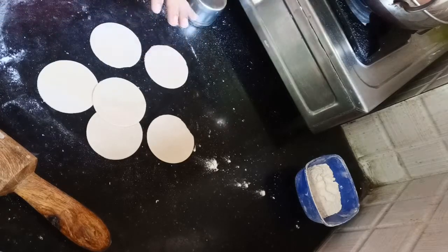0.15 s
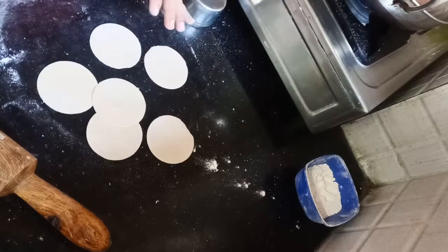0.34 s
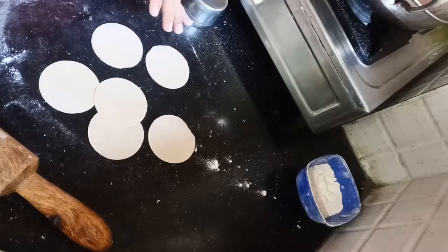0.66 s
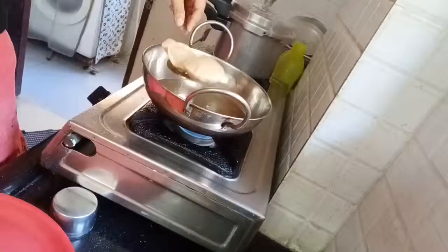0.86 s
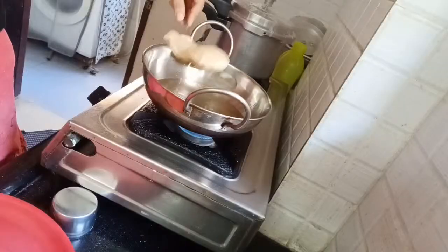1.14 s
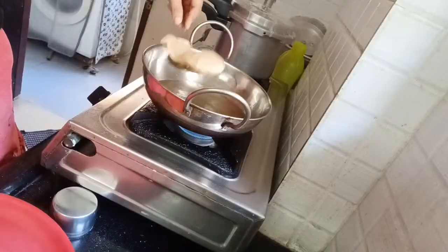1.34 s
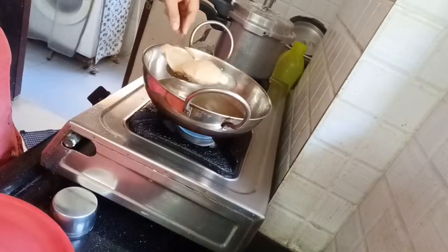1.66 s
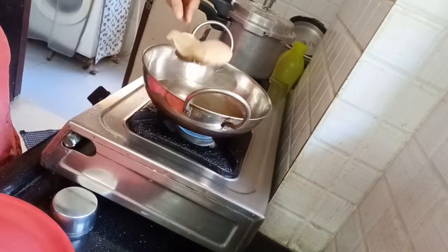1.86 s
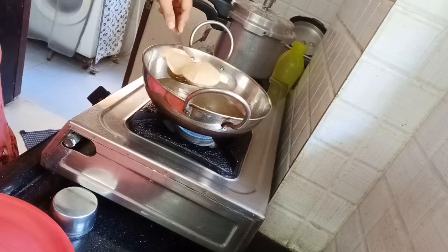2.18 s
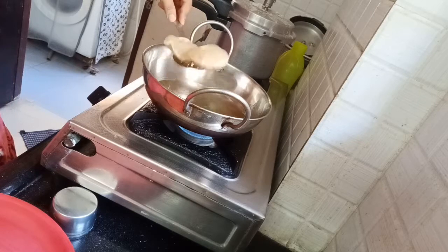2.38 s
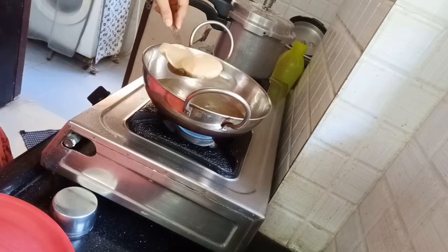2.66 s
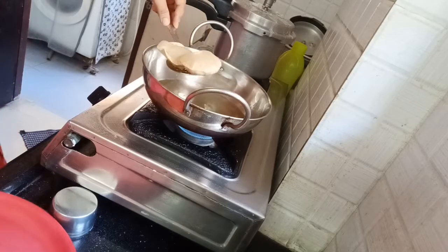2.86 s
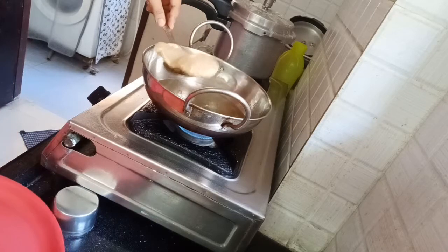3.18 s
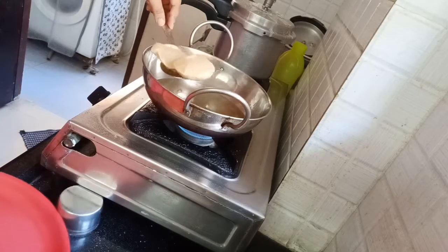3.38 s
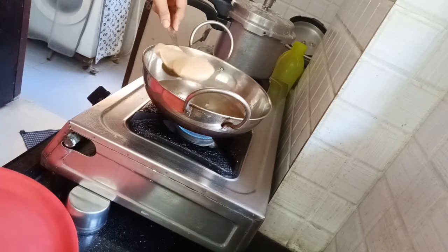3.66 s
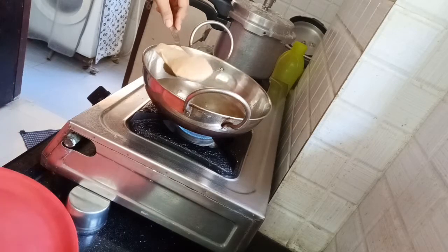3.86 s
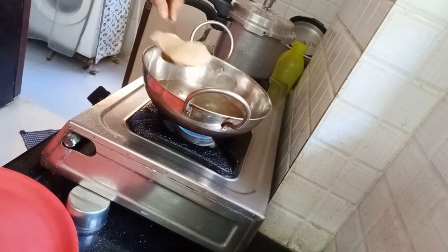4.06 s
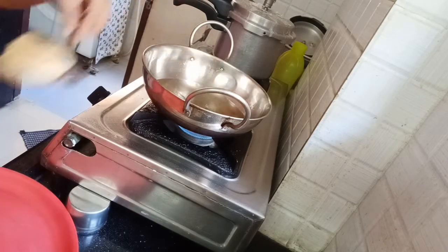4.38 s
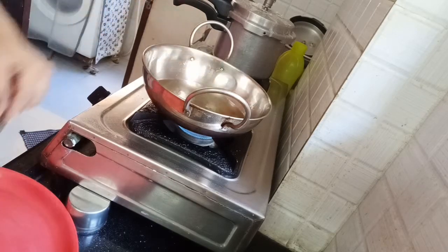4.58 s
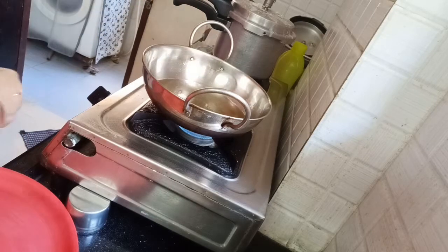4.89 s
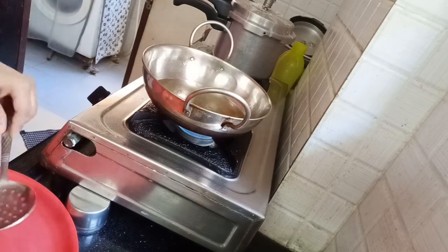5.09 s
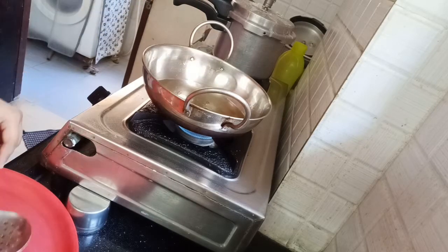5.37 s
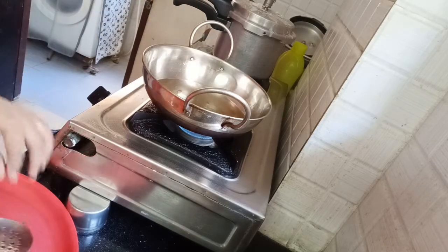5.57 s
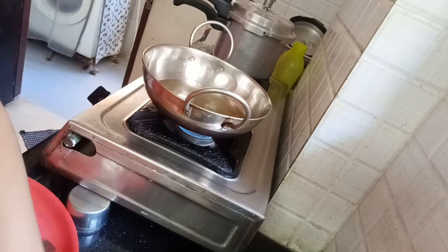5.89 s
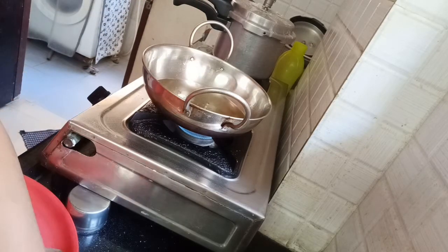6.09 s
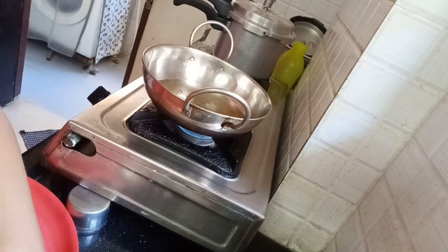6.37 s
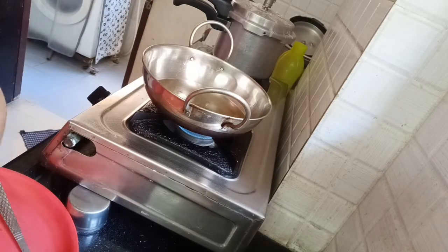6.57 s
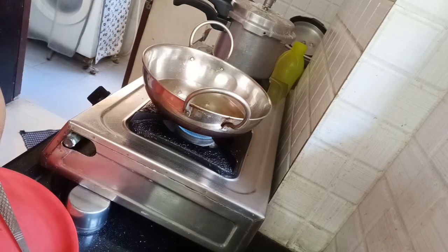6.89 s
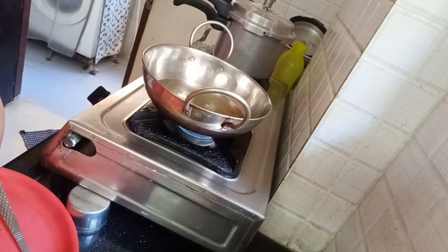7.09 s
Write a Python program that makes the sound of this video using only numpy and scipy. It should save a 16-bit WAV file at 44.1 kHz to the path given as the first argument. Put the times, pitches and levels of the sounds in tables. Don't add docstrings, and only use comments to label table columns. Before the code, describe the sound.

A close phone microphone in a small tiled kitchen. From 0 s, a faint high gas-burner hiss with slight room rumble fades to near silence by 0.87. At 0.88 a steam jet bursts in abruptly, loud, broad and bright with a thin singing edge around 7 kHz; it holds until about 1.35, then falls and is gone by 1.8. A metallic clank sits under its tail at 1.4. Quiet burner hiss remains, with distant pan hums, dull thumps and soft rustles. A short rough pot scrape runs 2.6-3.1, with a light hollow knock at 2.94. Faint far clatter continues; another light knock and rustle come at 4.72. At 5.41 a steel skimmer lands hard on a hollow plastic plate: a sharp crack, then dense ticks and rocking knocks until 5.8, sparser taps to 6.2. Faint hiss and tiny distant hums close by 7.2.

```python
import sys
import numpy as np
from scipy import signal
from scipy.fft import rfft, irfft, next_fast_len
from scipy.io import wavfile
from scipy.ndimage import uniform_filter1d, map_coordinates

SR = 44100
rng = np.random.default_rng(int(sys.argv[2]) if len(sys.argv) > 2 else 0)


def master(y):
    cut = np.clip(np.atleast_2d(y).T, -1, 1)
    pcm = np.round(cut * 32767)
    wavfile.write(sys.argv[1], SR, pcm.astype(np.int16))


def voltage_ratio(decibels):
    exponent = np.asarray(decibels, float) / 20
    return 10 ** exponent


N = 319284
CUT_S = 0.881


def unit(x):
    return x / np.sqrt(np.mean(x ** 2) + 1e-20)


def along(points, hz):
    f, v = np.transpose(points)
    return np.interp(np.log(hz + 1), np.log(f + 1), v)


def curves(rows):
    s, *cols = np.vstack(rows).T
    return [np.interp(np.arange(N) / SR, s, c) for c in cols]


def wobble(rate_hz, size=N):
    knots = rng.standard_normal(int(size * rate_hz / SR) + 4)
    return map_coordinates(knots, [np.arange(size) * rate_hz / SR])


def filtered(x, response):
    m = next_fast_len(N + SR // 2)
    return irfft(rfft(x, m) * response(np.fft.rfftfreq(m, 1 / SR)), m)[..., :N]


def patchy(depth_db):
    z = signal.stft(rng.standard_normal(N + 512), nperseg=512)[2]
    field = uniform_filter1d(rng.standard_normal(z.shape), size=5, axis=0)
    field = uniform_filter1d(field, size=12, axis=1)
    return signal.istft(z * voltage_ratio(depth_db * unit(field)), nperseg=512)[1][:N]


def coloured(x, spectrum):
    return unit(filtered(x, lambda hz: voltage_ratio(along(spectrum, hz))))


def resonant(x, peaks):
    def once(f):
        total = 0
        for k, (centre, width, db) in enumerate(peaks):
            damping = 1j * f * width
            total = total + (-1) ** k * voltage_ratio(db / 2) * damping / (centre * centre - f * f + damping)
        return total
    return unit(filtered(x, lambda f: once(f) ** 2))


def ring(modes, t, spread_db):
    out = 0
    for hz, db, t60 in modes:
        level_db = db + spread_db * rng.standard_normal() - 60 * t / t60
        out = out + voltage_ratio(level_db) * np.sin(2 * np.pi * hz * t)
    return out


def bursts(rows, rise_db_s, fall_db_s):
    t = np.arange(0, N, 32)[:, None] / SR
    s, held, *cols = np.transpose(rows)
    loss_db = rise_db_s * np.maximum(s - t, 0) + fall_db_s * np.maximum(t - s - held, 0)
    gains = [np.linalg.norm(voltage_ratio(c - loss_db), axis=1) for c in cols]
    return [np.interp(np.arange(N) / SR, t[:, 0], g) for g in gains]


def swell(t, rise_s, t60):
    return np.minimum(t / rise_s, 1) * voltage_ratio(-60 * np.maximum(t - rise_s, 0) / t60)


def steady(x):
    return x / np.sqrt(np.abs(uniform_filter1d(x ** 2, size=1300)) + 0.014)


def room(x, decay):
    hz, t, z = signal.stft(rng.standard_normal(SR // 2), SR, nperseg=256)
    tail = signal.istft(z * voltage_ratio(-60 * t / along(decay, hz)[:, None]), SR, nperseg=256)[1]
    return signal.fftconvolve(np.pad(x, (200, 0)), tail / np.linalg.norm(tail))[:N]


def thumps():
    # start_s, held_s, lower_mode_db, upper_mode_db
    floor_bumps = [(.1, 0.16, -67, -57.5), (.386, 0.009, -65, -60), (.448, 0.011, -70, -84),
                   (1.66, 0.091, -69, -65.5), (2.0, 0.013, -57, -58), (2.08, .01, -62, -72),
                   (2.15, 0.0088, -63, -58.5), (2.98, 0.016, -44.5, -70), (3.3, 0.02, -63, -80),
                   (3.48, .01, -66, -82), (3.64, 0.0088, -67, -53.5), (3.77, 0.0077, -57, -57.5),
                   (3.87, 0.047, -58, -58), (4.01, 0.0049, -62, -47.5), (4.12, 0.035, -69, -60.5),
                   (4.73, 0.083, -55, -54), (4.83, 0.014, -51.5, -58), (5.445, 0.041, -44.5, -40),
                   (5.65, 0.066, -45.5, -49), (5.868, 0.0077, -57.5, -57.5), (6.05, 0.056, -46.5, -48),
                   (6.17, 0.05, -49.5, -48.5), (6.39, 0.1, -60, -54), (7.0, 0.088, -68, -63.5)]
    gains = bursts(floor_bumps, rise_db_s=320, fall_db_s=274)
    rests = [voltage_ratio(rest_db + 3.6 * wobble(8.9)) for rest_db in (-71.5, -75)]
    peaks = [(105.3, 21.3, 0)], [(150.8, 23.7, 0)]  # centre_hz, width_hz, level_db
    modes = [steady(resonant(rng.standard_normal(N), peak)) for peak in peaks]
    return sum(np.hypot(gain, rest) * mode for gain, rest, mode in zip(gains, rests, modes))


def hums():
    # start_s, t60_s (60 dB down at 0.7 of it), pitch_hz, level_db
    pans = [(2.1, 0.91, 2180, -64), (2.5, 1.2, 1300, -71), (2.5, 1.3, 2170, -54), (2.5, 0.6, 5800, -59),
            (2.5, 0.59, 452, -50.5), (3, 0.39, 450, -49), (2.5, 0.44, 2500, -55), (3, 0.2, 2490, -55),
            (3, 0.4, 1450, -58), (3.5, 0.3, 1440, -54.5), (3, 0.68, 356.3, -46.5), (3, 0.7, 890, -47.5),
            (3.36, 0.87, 960, -55.5), (3, 0.31, 450, -47), (3.5, 0.18, 980, -48.5), (3.5, 0.5, 910, -58.5),
            (3.5, 0.5, 7560, -56), (4, 0.33, 690, -69), (3.5, 0.42, 380, -53.5), (4.03, 0.77, 840, -59.5),
            (5, 0.47, 2400, -59), (5.5, 0.23, 350, -37), (5.5, 0.45, 1340, -41), (6.08, .4, 9900, -68),
            (6.09, 0.3, 7300, -52), (6.101, 0.33, 390, -56), (6.22, 0.7, 2890, -61), (0.0, .6, 4100, -63),
            (0.2, 1.3, 3325, -65), (.25, .8, 1465, -67), (2.17, .5, 4105, -59), (1.5, .4, 4505, -62),
            (1.98, .2, 1100, -61), (2.18, .4, 3350, -64), (6.28, .4, 1210, -63), (6.06, .3, 2400, -57),
            (6.48, 1, 699, -62), (0, 2.7, 798, -69), (4.98, 0.5, 1100, -63)]
    # start_s, t60_s (60 dB down at 0.7 of it), pitch_hz, level_db
    shelf = [(1.395, 0.61, 1015, -41.5), (1.42, .4, 1480, -45), (3.42, 0.58, 9740, -57),
             (4.375, 0.48, 1115, -58.5), (4.58, 0.32, 900, -62), (4.92, 1.2, 2810, -60.5),
             (5.9, .8, 2950, -60), (2.08, 0.44, 1120, -60), (2.95, 0.3, 409, -52), (2.96, .45, 770, -55),
             (3.3, .7, 633, -64), (3.58, 0.66, 3140, -65.5), (3.7, .5, 3600, -69),
             (3.739, 0.23, 1015, -54.5), (3.78, 1, 3180, -64), (3.76, 0.77, 1390, -63),
             (3.919, 0.77, 1015, -59), (3.95, .9, 3710, -67), (4.081, 0.31, 1140, -58),
             (4.12, 0.47, 4100, -60), (4.17, .3, 910, -65), (4.38, .6, 3700, -65), (4.55, .8, 3680, -60),
             (4.47, 0.32, 720, -60), (4.52, .5, 3420, -61), (4.74, 0.26, 430, -46.5),
             (4.76, 0.83, 948, -55), (4.73, .9, 1910, -59), (4.77, .3, 2725, -58), (4.8, 0.4, 4000, -63),
             (4.92, .5, 3340, -64), (5.0, .35, 920, -65), (5.09, 0.26, 680, -65), (5.041, 0.28, 2410, -64),
             (5.14, 0.63, 2840, -65), (5.249, 0.35, 1154, -70), (5.121, 0.22, 1480, -64),
             (5.425, .25, 1440, -38), (5.43, 0.3, 1910, -39), (5.56, .2, 1880, -46),
             (5.6, 0.43, 1460, -45.5), (5.93, 0.67, 3250, -60), (5.91, .4, 3640, -58),
             (6.17, 0.25, 1390, -55), (6.2, 1.1, 3640, -63), (6.31, .25, 4720, -63), (6.47, .35, 1520, -61),
             (6.481, 0.71, 1890, -66), (6.48, .5, 2208, -63), (6.62, 1.4, 3500, -76),
             (6.86, 0.18, 895, -65), (6.95, .4, 4770, -66), (7.07, 0.78, 3650, -67), (7.12, .4, 1320, -67),
             (7.15, .4, 1022, -64)]
    # start_s, t60_s (60 dB down at 0.7 of it), pitch_hz, level_db
    loose_lids = [(1.4, 0.57, 5040, -38), (6.6, 1.6, 2895, -83), (0.202, 1.4, 1583, -66),
                  (3.801, 1.5, 3350, -59), (4.5, 1.08, 3090, -67), (5.85, 2.0, 3450, -55.5),
                  (5.75, .5, 2700, -58), (6.44, 0.51, 1200, -56), (7.089, 0.67, 1183, -60)]
    rise_s = 0.023
    out, t = np.zeros(N + SR), np.arange(SR) / SR
    for rows, blur in ((pans, 1.08), (shelf, 0.75), (loose_lids, 7.55)):
        for s, t60, hz, db in rows:
            line_width_hz = blur * np.sqrt(hz)
            drift = np.cumsum(rng.standard_normal(SR)) * np.sqrt(2 * np.pi * line_width_hz / SR)
            level_db = db + 2.6 * wobble(40, size=SR) - 60 * (t / (.7 * t60)) ** 2
            phase = 2 * np.pi * hz * t + uniform_filter1d(drift, size=60)
            out[round(s * SR):][:SR] += voltage_ratio(level_db) * np.minimum(t / rise_s, 1) * np.sin(phase)
    return out[:N]


def stir():
    # start_s, held_s, drum_db, clatter_db
    pushes = [(1.46, 0.04, -73, -50), (1.82, 0.63, -78, -64.5), (2.7, 0.047, -77, -59),
              (2.84, 0.094, -79, -65), (2.96, 0.067, -53, -59), (3.41, .02, -70, -67),
              (3.82, 0.46, -69, -66.5), (4.45, .05, -75, -72), (4.75, 0.18, -69.5, -65),
              (5.62, 0.019, -51, -47), (5.86, 0.022, -59, -59.5), (6.05, 0.11, -67.5, -55.5),
              (6.58, 0.03, -81, -63), (7.15, 0.028, -70, -66)]
    # centre_hz, width_hz, level_db
    drum_peaks = [(349.6, 30, -3), (438, 58, -2), (678, 255, -7.5)]
    # centre_hz, width_hz, level_db
    clatter_peaks = [(780, 155, -6), (920, 60, 6.5), (1111, 200, 3), (1497, 247, 2), (1890, 345, -5.5)]
    # freq_hz, density_db_per_hz
    rumble_spectrum = [(13, -45), (22, -10), (43, -14), (103, -4.5), (166, -2.5), (226, -3.5), (300, -1),
                       (390, -53), (660, -120)]
    drum_gain, clatter_gain = bursts(pushes, rise_db_s=121, fall_db_s=96)
    drum_gain = np.hypot(drum_gain, voltage_ratio(-76.5))
    clatter_gain = np.hypot(clatter_gain, voltage_ratio(-68))
    drum = drum_gain * voltage_ratio(1.2 * wobble(6.3)) * resonant(patchy(depth_db=3), drum_peaks)
    clatter = clatter_gain * voltage_ratio(1.5 * wobble(20)) * resonant(patchy(depth_db=2.4), clatter_peaks)
    rumble_gain = np.minimum(clatter_gain, voltage_ratio(-66.5)) * voltage_ratio(-6.5)
    return drum + clatter + rumble_gain * coloured(patchy(depth_db=-2.5), rumble_spectrum)


def scrape():
    # start_s, level_db
    drag = [(2.58, -61.5), (2.64, -47.5), (2.7, -46), (2.8, -48), (2.87, -52), (2.92, -55), (3.0, -54),
            (3.1, -58)]
    # centre_hz, width_hz, level_db
    pot_peaks = [(452, 30, -9.5), (820, 37, -11.5), (1140, 140, -16), (1714, 60, -6), (2174, 85, 0),
                 (2490, 160, -9), (3040, 45, -5), (3470, 54, -9), (3930, 35, -9), (4680, 200, -9)]
    level_db, = curves(drag)
    t = np.arange(N) / SR
    slips = voltage_ratio(0.88 * wobble(45)) * rng.standard_normal(N)
    grit = .5 * resonant(slips, [(2080, 1800, 0)])
    moving = (t > drag[0][0]) * (t < drag[-1][0])
    return (resonant(slips, pot_peaks) + grit) * voltage_ratio(level_db) * moving


def brushes():
    # start_s, rise_s, t60_s, level_db
    strokes = [(2.1, 0.051, 0.75, -49.5), (2.58, 0.067, 1, -51.5), (3.03, 0.064, 0.75, -45.5),
               (3.12, 0.058, 0.43, -52.5), (3.39, 0.089, 0.68, -47.5), (4.05, 0.076, 0.35, -55),
               (4.42, 0.076, 0.41, -53.5), (4.713, 0.022, 1.46, -42.5), (5.412, 0.023, 0.6, -35),
               (5.535, 0.0092, 1.05, -40.5), (6.08, 0.048, 0.95, -47), (6.43, 0.069, 0.36, -55)]
    # freq_hz, density_db_per_hz
    rustle_spectrum = [(290, -27), (500, -8.5), (578, -7), (933, -7), (1230, -10.5), (1400, -6.5),
                       (1620, -9), (5020, -9), (6700, -8.5), (14900, -27.5), (16000, -9.5)]
    level, t = np.zeros(N + SR), np.arange(SR) / SR
    for s, rise_s, t60, db in strokes:
        level[round(s * SR):][:SR] += voltage_ratio(db) * swell(t, rise_s, t60)
    grains = voltage_ratio(1.8 * wobble(120)) * patchy(depth_db=-2.0)
    return level[:N] * coloured(grains, rustle_spectrum)


def burner():
    # start_s, strength_db
    flame = [(0.0, -52.5), (.1, -53), (1.68, -50.5), (1.87, -52), (2.59, -51), (2.66, -44.5), (2.8, -48),
             (3.03, -50.5), (3.48, -51.5), (3.62, -52.5), (4.49, -53), (4.7, -53.5), (5.4, -54),
             (5.58, -50.5), (5.79, -53.5), (6.36, -54), (7.24, -55.5)]
    # freq_hz, density_db_per_hz
    hiss_spectrum = [(2530, -24), (4300, -29), (5790, -11.5), (6820, -0.5), (7960, -9.5), (9340, -14.5),
                     (11100, -15), (12200, -18), (14900, -16.5), (16000, -14.5)]
    # freq_hz, density_db_per_hz
    roar_spectrum = [(1060, -35), (1800, -42), (1910, -32), (2310, -7.5), (2440, -9.5), (3180, -3),
                     (3750, -1.5), (4250, -6), (4800, -4.5), (6240, -4), (10600, -120)]
    flame_db, = curves(flame)
    spits = (rng.random(N) < 300 / SR) * rng.standard_normal(N)
    hiss = coloured(unit(patchy(depth_db=1.45)) + .3 * unit(spits), hiss_spectrum)
    roar = coloured(patchy(depth_db=1.6), roar_spectrum)
    usual_flame_db = -53
    roar_db = -61 + 1.4 * (flame_db - usual_flame_db)
    return voltage_ratio(flame_db + 0.088 * wobble(4.94)) * hiss + voltage_ratio(roar_db) * roar


def steam():
    # (2.44 dB of low boost per unit, with some loss of highs)
    pressure = [
        (0.89, -14, 0.5),
        (0.902, -17.5, 1),
        (1.33, -17, 0.5),
        (1.488, -25.5, 4.5),
        (1.632, -46.5, 3.5),
        (1.8, -62, 7.5),
    ]
    # freq_hz, density_db_per_hz
    jet_spectrum = [(16, -54), (28, -21), (111, -17.5), (383, -23.5), (800, -19), (966, -20), (1640, -23.5),
                    (3000, -12.5), (4720, -15), (5530, -11), (6830, .5), (7700, -3.5), (8200, -9),
                    (8800, -8.5), (9630, -13), (10700, -10), (11900, -16.5), (15500, -14.5)]
    # centre_hz, width_hz, level_db
    lid_peaks = [(5884, 20, -8), (6024, 25, -10), (6325, 20, -5), (6420, 45, -3), (6544, 22, -2),
                 (6611, 20, -2), (6702, 18, -2), (6817, 18, -4), (6894, 18, 0), (6972, 18, -2),
                 (7068, 35, -2), (7315, 20, -5), (7559, 16, -3), (7661, 18, -3)]
    # freq_hz, t60_s
    wall_decay = [(200, .06), (1500, .1), (7000, .35), (15000, .2)]
    level_db, tilt_db = curves(pressure)
    t = np.arange(N) / SR
    drops = voltage_ratio(1.3 * wobble(260)) * rng.standard_normal(N)
    jet = drops + 0.78 * patchy(depth_db=3.0)
    jet = coloured(jet + .5 * room(jet, wall_decay), jet_spectrum)
    jet = unit(jet + 0.38 * resonant(drops, lid_peaks))
    low = filtered(jet, lambda hz: 1 / (1 + (hz / 2200) ** 4) / (1 + (350 / (hz + 1)) ** 4))
    high = filtered(jet, lambda hz: 1 / (1 + (9500 / (hz + 1)) ** 6))
    dulled = jet - np.clip(0.073 * tilt_db, 0, .8) * high + (voltage_ratio(2.44 * tilt_db) - 1) * low
    valve = np.clip((t - CUT_S) / 0.019, 0, 1) * (t < pressure[-1][0])
    return valve * voltage_ratio(level_db + 0.14 * wobble(21.6)) * dulled


def skimmer():
    # start_s, peak_db, brightness_db, ring_db
    ticks = [(2.935, -26, -23, -32), (4.715, -29.5, -14, -19), (5.288, -49, -27, -22),
             (5.4113, -8, -16, -24), (5.4374, -15, -24, -29), (5.532, -14.5, -10, -16.5),
             (5.5449, -26, -2, -32), (5.575, -27, -20, -28), (5.807, -36, -25, -28), (5.561, -18, -20, -28),
             (5.625, -24, -18, -16), (5.6664, -27.5, -14, -14), (5.6775, -24, -34, -32),
             (5.7647, -27, -18, -19), (5.8922, -30.5, -25, -19), (5.911, -34, -22, -28),
             (6.1018, -32, -14, -20), (6.109, -32.5, -20, -22), (6.1368, -26.5, -15, -19),
             (6.168, -32, -18, -13), (5.5205, -29, -30, -32), (5.724, -32, -20, -25)]
    # freq_hz, level_db, t60_s
    steel_modes = [(2410, -1, 0.024), (2930, -9.5, 0.034), (3160, -10, 0.04), (5940, -25, 0.084),
                   (6560, -4, 0.035), (6850, 0, .045), (7120, -1, .04), (7400, -3, 0.056),
                   (7600, -4, 0.045), (9200, -19, 0.085), (9810, -11, 0.075), (10290, -20, 0.077),
                   (12000, -14, .05), (13740, -22, .05)]
    # freq_hz, density_db_per_hz
    crack_spectrum = [(100, -36), (880, -4), (1500, -4), (2300, -4), (2930, -1.5), (3840, -2.5),
                      (4800, -10.5), (6760, -8.5), (8770, -16), (10000, -29), (11500, -27), (12000, -25),
                      (15600, -47), (22000, -120)]
    cracks, edges, rings = np.zeros((3, N + SR))
    t = np.arange(SR // 4) / SR
    decay = voltage_ratio(-60 * t / 0.0077) + 0.089 * voltage_ratio(-60 * t / 0.07)
    for s, db, bright_db, ring_db in ticks:
        snap = voltage_ratio(db - 6.5) * decay * rng.standard_normal((2, len(t)))
        snap[:, 0] += voltage_ratio(db + 3)
        span = slice(round(s * SR), round(s * SR) + len(t))
        cracks[span] += snap[0]
        edges[span] += voltage_ratio(bright_db + 4) * snap[1]
        rings[span] += voltage_ratio(db + ring_db) * ring(steel_modes, t, spread_db=2.5)
    crack = filtered(cracks[:N], lambda hz: voltage_ratio(along(crack_spectrum, hz) + 6.0))
    edge = filtered(edges[:N], lambda hz: 1 / (1 + (8500 / (hz + 1)) ** 6))
    return crack + edge + rings[:N]


def plate():
    # start_s, peak_db, low_body_db, pitch_hz, contact_ms
    hard_knocks = [
        (2.9375, -25.5, -21.5, 789, 4.16),
        (4.7175, -28, -24, 820, 2.9),
        (5.4123, -13, -6.5, 877, 2.45),
    ]
    # start_s, peak_db, low_body_db, pitch_hz
    rocking = [(2.952, -36.5, 7, 787), (2.968, -43, 5, 765), (3.0, -45, 0, 765), (4.724, -33, -12, 844),
               (4.731, -27, -7, 875), (4.744, -33.5, 1, 850), (4.754, -41, 11, 796), (5.419, -20, -12, 898),
               (5.433, -19.5, -0.5, 880), (5.4375, -17, -2, 863), (5.448, -30, 10, 860),
               (5.454, -21.5, 3.5, 838), (5.464, -28, 2, 1000), (5.474, -24, 0.5, 880),
               (5.489, -31, -10, 944), (5.507, -22, -12, 880), (5.519, -34, -5, 930),
               (5.546, -20.5, -2, 889), (5.56, -21.5, -9.5, 920), (5.566, -22, -14, 932),
               (5.576, -20, -7, 884), (5.586, -32, 5, 900), (5.595, -21.5, -23, 816),
               (5.627, -23, -29, 894), (5.637, -27, -20, 920), (5.648, -27, -8, 920), (5.677, -26, -9, 878),
               (5.69, -28, -9, 900), (5.705, -29, -8, 920), (5.719, -34, -6, 853), (5.764, -39, -15, 885),
               (5.792, -34, -18, 896), (5.805, -33.5, -22, 858), (5.877, -32.5, -27, 865),
               (5.921, -41, -28, 840), (5.935, -34.5, -28, 860), (5.984, -31, -35, 848),
               (6.03, -35, -32, 836), (6.107, -31.5, -28, 860), (6.149, -37, 7.5, 850),
               (6.197, -41, -1, 800)]
    # multiple_of_pitch, level_db, t60_s
    plastic_modes = [(.87, -13, .035), (1.001, 0, .021), (1.0, -14, .06), (1.2, -14, .03),
                     (1.62, -14, .025), (2.1, -17, .02)]
    # freq_hz, level_db, t60_s
    body_modes = [(362, 0, .05), (422, 1, .06), (524, -4, .04)]
    soft_contact_ms = 4.0
    out, t = np.zeros(N + SR), np.arange(SR // 4) / SR
    for s, db, body_db, hz, contact_ms in hard_knocks + [(*bump, soft_contact_ms) for bump in rocking]:
        rise_s = max(contact_ms, .3) / 1000
        modes = [(k * hz, level_db - 1.2 * contact_ms * abs(k - 1), t60)
                 for k, level_db, t60 in plastic_modes]
        top = ring(modes, t, spread_db=0.5) * (1 - np.exp(-(t / rise_s) ** 2)) * voltage_ratio(2.38 * contact_ms)
        under = ring(body_modes, t, spread_db=3.5) * (1 - np.exp(-(t / 0.0067) ** 2))
        knock = top + voltage_ratio(body_db - 0.5) * under
        out[round((s - .8 * rise_s) * SR):][:len(t)] += voltage_ratio(db - 1.5) * knock
    return filtered(out[:N], lambda hz: (1j * hz / (90 + 1j * hz)) ** 2)


def scene():
    # freq_hz, t60_s
    tile_decay = [(200, 0.12), (1000, 0.94), (4000, 0.16), (12000, 0.015)]
    # start_s, gain_db
    fade_points = [
        (.15, 1),
        (.52, -8),
        (.7, -12),
        (.87, -33),
    ]
    knocks, ticks = plate(), skimmer()
    wet = voltage_ratio(-15) * room(knocks, tile_decay) + voltage_ratio(-4.5) * room(ticks, tile_decay)
    near = knocks + ticks + burner() + steam() + brushes()
    far = stir() + thumps() + scrape() + hums()
    fade_db = curves(fade_points)[0] * (np.arange(N) / SR < CUT_S)
    return (voltage_ratio(fade_db) * (near + wet + far))[None]


def top_cut(x):
    return signal.sosfilt(signal.butter(12, 16760, fs=SR, output="sos"), x)


def record(dry):
    soft = dry / (1 + np.abs(dry / .7) ** 4) ** (1 / 4)
    edge_hz, top_hz = 15350, 15900

    def band_limit(hz):
        return np.cos(np.pi / 2 * np.clip((hz - edge_hz) / (top_hz - edge_hz), 0, 1)) ** 2
    return top_cut(filtered(soft, band_limit))


dry = scene()
out = record(dry)
master(out)
```